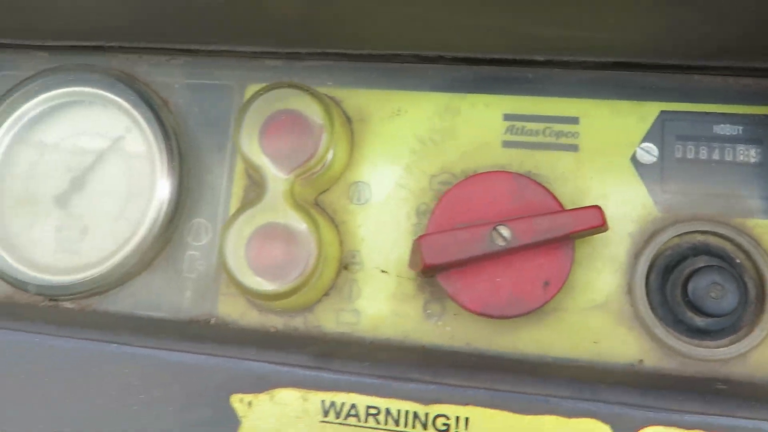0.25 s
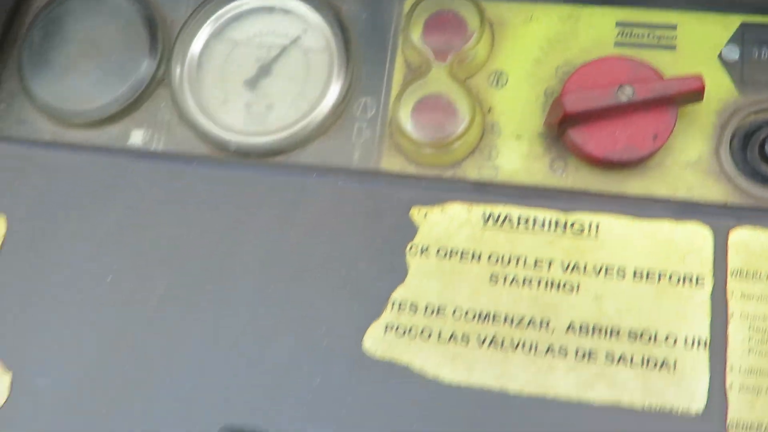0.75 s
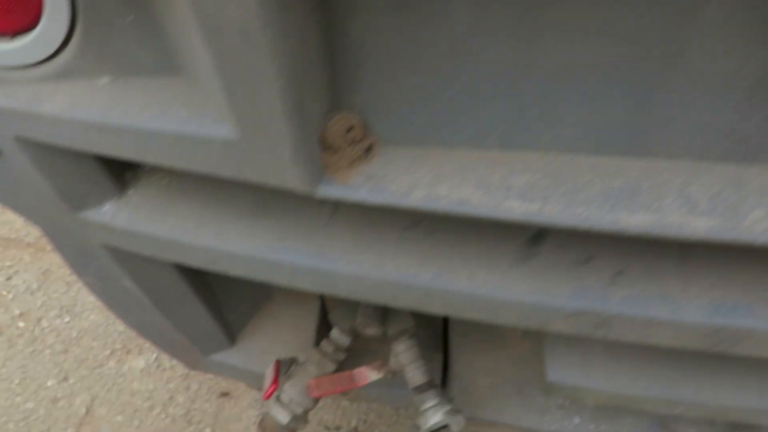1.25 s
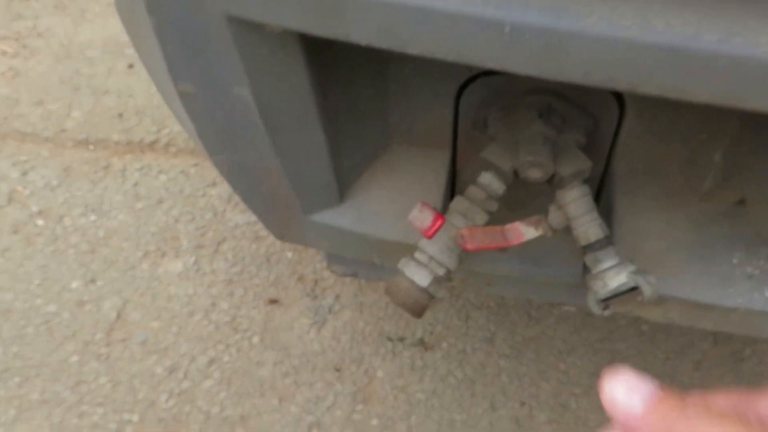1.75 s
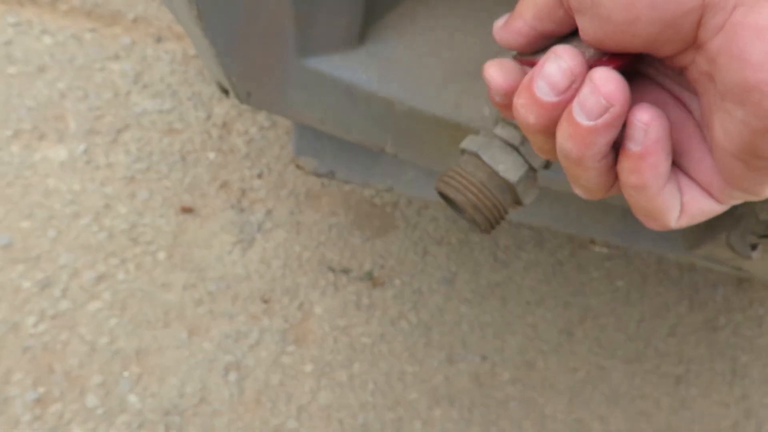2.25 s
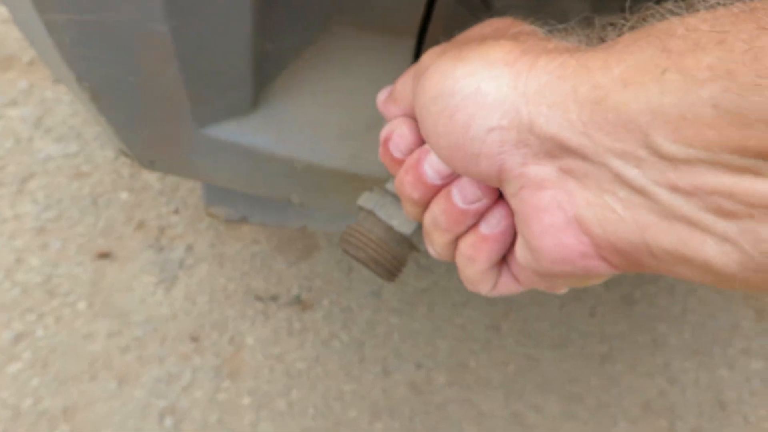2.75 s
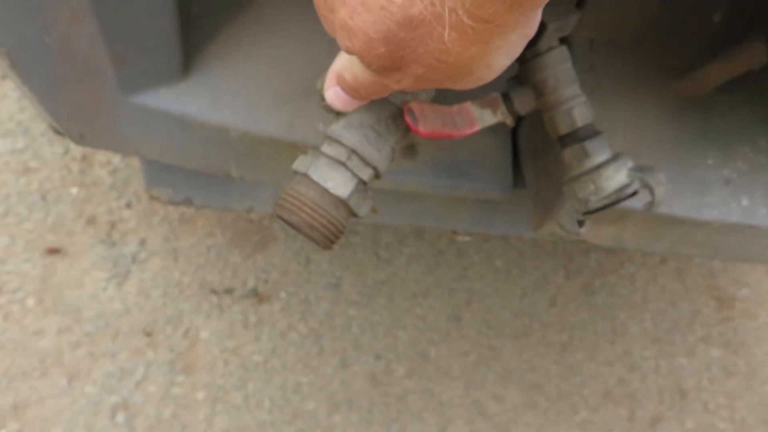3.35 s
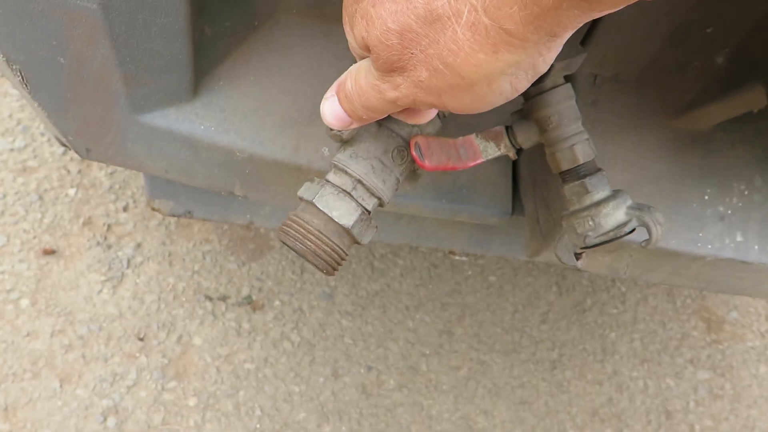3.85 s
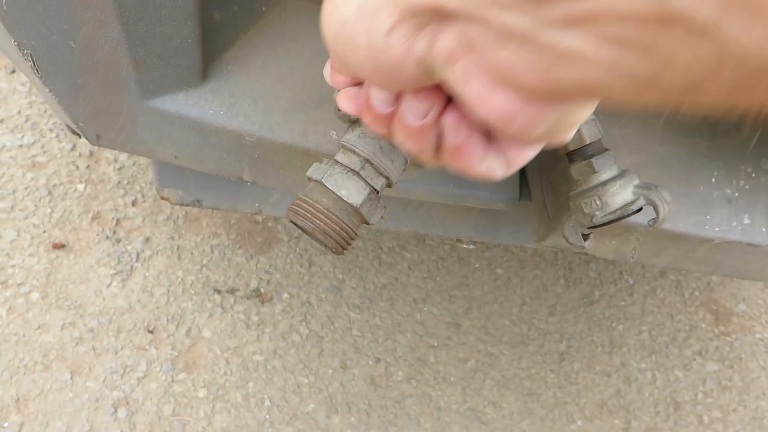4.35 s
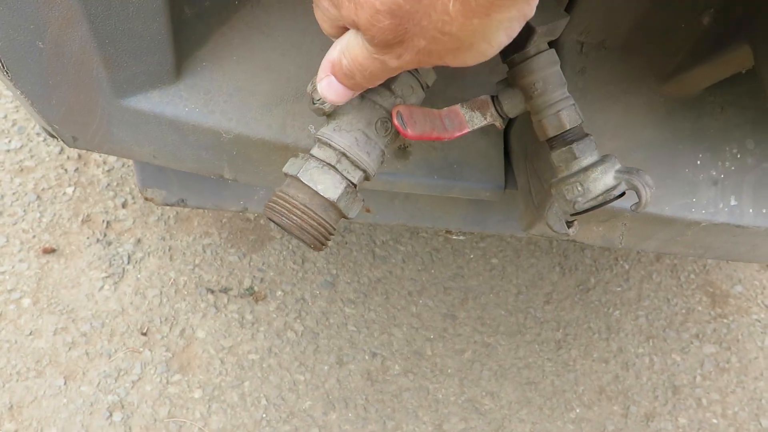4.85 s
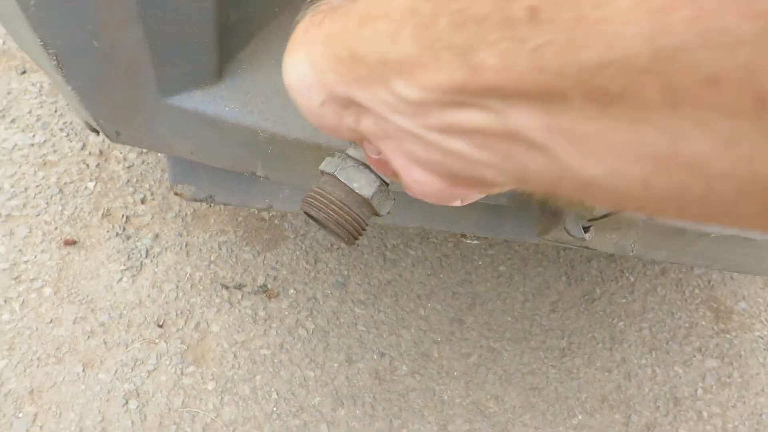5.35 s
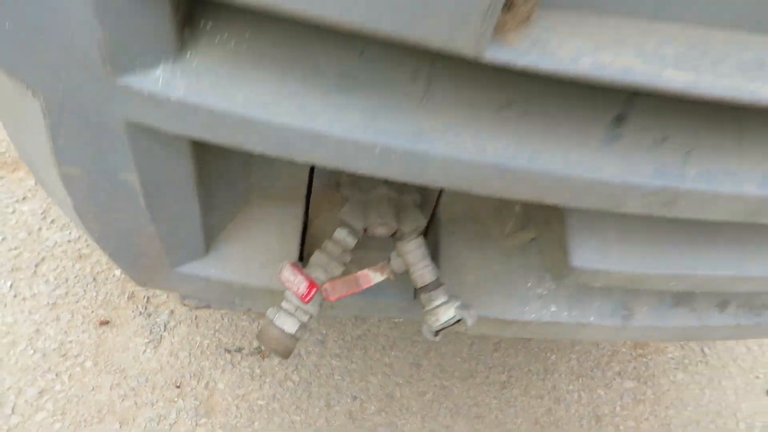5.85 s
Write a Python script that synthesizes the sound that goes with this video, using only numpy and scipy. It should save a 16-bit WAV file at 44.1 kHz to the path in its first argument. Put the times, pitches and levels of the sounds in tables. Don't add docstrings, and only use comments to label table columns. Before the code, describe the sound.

Steady chugging diesel machine close up, then compressed air bursts harshly from a pipe twice, the engine ducking under it and thinner afterwards.

```python
import sys
import numpy as np
from scipy import signal
from scipy.io import wavfile
from scipy.ndimage import uniform_filter1d

SR = 44100
rng = np.random.default_rng(int(sys.argv[2]) if len(sys.argv) > 2 else 0)


def unload_audio(sound):
    columns = np.transpose(np.atleast_2d(sound))
    steps = np.round(np.clip(columns, -1, 1) * 32767)
    wavfile.write(sys.argv[1], SR, steps.astype(np.int16))


def elevation(decibels):
    levels = np.asarray(decibels, float)
    return 10 ** (levels / 20)


N = 269010
T = np.arange(N) / SR
FRAME_T = np.arange(N // 256 + 9) * 256 / SR
BIN_HZ = np.fft.rfftfreq(1024, 1 / SR)

# t/s, cycles f/Hz
ENGINE_SPEED = [
    (0, 12.64),
    (1.5, 12.63),
    (2.0, 12.66),
    (3.45, 12.65),
    (4.6, 12.55),
    (5.4, 12.4),
    (6.1, 12.42),
]
# t/s, place (0 panel, 1 outlets), nearness to the engine level/dB
CAMERA_PATH = [(0, .01, 1.5), (.4, .01, 3.5), (.8, 0.035, 3.5), (1.05, 0.14, -1), (1.3, 0.41, -0.5),
               (1.7, 0.59, 0.5), (2., 0.68, 1.5), (2.3, .93, 1), (3.4, 0.92, 2), (4.85, 1, 2.5),
               (5.4, 1, 3), (5.75, 0.76, -0.5), (6.1, 0.3, -3)]
TONE_ORDERS = [4, 8, 11, 12, 13, 16, 17, 19, 20, 24, 32, 36, 37, 38, 39, 40, 42, 43, 44, 45, 48, 54, 98, 99,
               100, 104, 108, 112, 5, 21]
TONES_PANEL = [-20.5, -26, -39, -27, -39, -32, -32, -35, -31, -34, -32, -38, -41, -48, -41, -34, -47, -46,
               -41, -43, -45, -57, -57, -51, -59, -45, -49, -54, -41, -39]
TONES_MIDWAY = [-20.5, -31, -37, -33, -33, -32, -33, -35, -26, -28, -42, -43, -41, -45, -44, -34, -40, -45,
                -40, -50, -44, -44, -49, -47, -47, -46, -43, -49, -41, -38]
TONES_OUTLET = [-20, -35, -40, -46, -32, -38, -35, -39, -27, -32, -46, -44, -34, -39, -38, -33, -35, -36,
                -38, -39, -37, -39, -43, -39, -36, -44, -39, -43, -41, -42]
# f/Hz, panel level/dB per Hz, outlet level/dB per Hz
KNOCK_SPECTRUM = [(40, -71, -70), (76.4, -51, -74), (137, -67.5, -53.5), (185, -42, -59), (265, -55.5, -57),
                  (374, -61, -59), (595, -62, -58.5), (1080, -66.5, -63), (1890, -62, -62),
                  (2370, -64.5, -65), (3310, -67.5, -66), (4800, -79, -78)]
CYLINDER_KNOCK = [-5, -0.5, -8, -1.5]
# f/Hz, width/Hz, level/dB
HOUSING_RINGS = [(525, 180, 3.5), (670, 37, 3), (950, 190, 4.5), (1294, 186, 8), (1606, 160, 3.5),
                 (2052, 145, 4.5), (2780, 330, 2.5)]
# f/Hz, panel level/dB per Hz, outlet level/dB per Hz
HISS_SPECTRUM = [(1500, -94, -115), (3040, -62.5, -73.5), (4860, -61.5, -68), (7600, -62, -68.5),
                 (8450, -60.5, -67), (10700, -55, -62), (12750, -57, -66), (15800, -66, -75)]
# open t/s, hand's turning time/s, shut t/s, full jet level/dB, held whistle against jet level/dB
VALVE_BLASTS = [
    (3.43, 0.042, 4.452, 17, -9.5),
    (4.862, .013, 5.362, 12.5, -15),
]
# f/Hz, level/dB per Hz
JET_SPECTRUM = [(100, -6), (300, -5.5), (700, -5.5), (1500, -4), (2500, -2), (4000, -1.5), (7000, -3),
                (9500, 0.5), (12500, 1.5), (15500, -8)]
# f/Hz, width/Hz, level/dB
PIPE_RINGS = [(1540, 110, -8), (2080, 830, -4.5), (4450, 670, 2), (9240, 1200, -2.5)]
# t/s, share switched in (0-1)
WIND_SWITCH = [
    (3.49, 0),
    (3.53, .7),
    (3.715, .66),
    (3.73, 1),
]
# f/Hz, likeness (0-1)
ENGINE_LIKENESS = [(60, .9995), (180, 0.97), (550, 0.84), (900, 0.88), (2500, 0.78), (4500, 0.32),
                   (7000, 0.32), (10000, 0.26), (15000, 0.25)]
JET_LIKENESS = [(60, 0.63), (550, 0.76), (1650, 0.89), (3000, 0.36), (4500, 0.53), (6500, 0.11),
                (11000, 0.36), (15000, .2)]
# f/Hz, level/dB
ENGINE_BALANCE = [(60, -4), (130, 1.5), (290, -2.5), (640, -2.0), (1410, -2), (3100, -0.5), (6820, -0.5),
                  (15000, -3)]
JET_BALANCE = [(60, 0.0), (130, -0.32), (290, 0.021), (640, 0.31), (1410, 0.14), (3100, -0.71),
               (6820, -2.0), (15000, 0.0)]
# f/Hz, phase/rad
ENGINE_LEAD = [(50, 0), (300, -.3), (3000, -.15), (5000, -.6), (8000, -2.5), (11000, -3.1), (16000, -3.1)]
JET_LEAD = [(50, 0), (5000, 0), (8000, 1.4), (11000, 1.9), (16000, 1.2)]
# f/Hz with likeness, then level/dB, then phase/rad
GUST_AT_PORTS = [
    [(60, -0.14), (300, -0.73), (1000, -0.77)],
    [(60, 0.), (1000, 0.)],
    [(60, 0), (1000, 0)],
]
ENGINE_AT_PORTS = (ENGINE_LIKENESS, ENGINE_BALANCE, ENGINE_LEAD)
JET_AT_PORTS = (JET_LIKENESS, JET_BALANCE, JET_LEAD)


def evened(x):
    return x / np.sqrt(np.mean(x ** 2) + 1e-20)


def curve(rows, column, t=T):
    return np.interp(t, [r[0] for r in rows], [r[column] for r in rows])


def read(rows, column=1):
    pitches = np.log([r[0] + 1 for r in rows])
    return np.interp(np.log(BIN_HZ + 1), pitches, [r[column] for r in rows])[:, None]


def drift(top_hz, count):
    hz = np.geomspace(.2, top_hz, 12)[:, None]
    rows = []
    for _ in range(count):
        waves = np.sin(2 * np.pi * (hz * FRAME_T + rng.random(hz.shape))) / np.sqrt(hz)
        rows.append(np.interp(T, FRAME_T, evened(waves.sum(0))))
    return rows


def noise(per_hz_db, ports, patchy_db):
    a, b, c, d, patches = rng.standard_normal((len(FRAME_T), 513, 5)).T
    patches = uniform_filter1d(patches, size=10, axis=0)
    patches = evened(uniform_filter1d(patches, size=10, axis=1))
    likeness, balance, lead = ports
    like = np.clip(read(likeness), -1, 1)
    tilt = elevation(read(balance) / 2) * np.exp(.5j * read(lead))
    left, other = a + 1j * b, c + 1j * d
    right = like * left + np.sqrt(1 - like ** 2) * other
    z = np.array([left * tilt, right / tilt])
    flat = signal.istft(z[0], nperseg=1024, noverlap=768)[1].std()
    shaped = z * elevation(per_hz_db + patchy_db * patches)
    x = signal.istft(shaped, nperseg=1024, noverlap=768)[1][:, 1024:N + 1024]
    return x / flat * np.sqrt(SR / 2)


def heard(rows, beyond_db=-110):
    below = (rows[0][0] / 2, beyond_db, beyond_db)
    above = (rows[-1][0] * 2, beyond_db, beyond_db)
    rows = [below] + list(rows) + [above]
    place = np.clip(curve(CAMERA_PATH, 1, FRAME_T - 1024 / SR), 0, 1)
    return read(rows, 1) * (1 - place) + read(rows, 2) * place


def nearness(offset_db):
    return elevation(curve(CAMERA_PATH, 2) + offset_db)


def crank():
    turns = np.cumsum(curve(ENGINE_SPEED, 1)) / SR
    return turns - np.interp(.0614, T, turns)


def exhaust(turns, waver_db=.3, slip=.09, apart=.08):
    place, out = curve(CAMERA_PATH, 1), np.zeros((2, N))
    wavers = drift(5., count=len(TONE_ORDERS))
    slips = drift(3.05, count=len(TONE_ORDERS))
    strengths = zip(TONES_PANEL, TONES_MIDWAY, TONES_OUTLET)
    for order, waver, wander, stops_db in zip(TONE_ORDERS, wavers, slips, strengths):
        loose = np.log(order / 3.8)
        late = rng.uniform(0, 2.5) * (order > 30)
        side = min(loose, 2) * np.array([[-1], [1]])
        level = elevation(np.interp(place, [0, .5, 1], stops_db) + waver_db * loose * waver + 0.2 * side)
        phase = 2 * np.pi * order * turns + slip * loose * wander + apart * side + late
        out -= np.sqrt(2) * level * np.cos(phase)
    refill_db = np.interp(T, (4.4, 4.5), [0, -3.])
    return out * nearness(-1.38 + refill_db)


def puffs(turns, sharp):
    firing = np.floor(4 * turns + .5).astype(int)
    chance_db = 0.56 * rng.standard_normal(400)[firing + 10]
    size_db = np.take(CYLINDER_KNOCK, firing % 4) + chance_db
    return elevation(size_db) * np.exp(sharp * (np.cos(8 * np.pi * turns) - 1))


def knock(turns):
    rings_db = 0
    for hz, width, db in HOUSING_RINGS:
        rings_db = rings_db + db * np.exp(-.5 * ((BIN_HZ[:, None] - hz) / (width / 2)) ** 2)
    body = noise(heard(KNOCK_SPECTRUM) + rings_db, ENGINE_AT_PORTS, patchy_db=0.54)
    return body * evened(1 + .5 * puffs(turns, sharp=13.0)) * nearness(0)


def hiss(turns):
    air = noise(heard(HISS_SPECTRUM), ENGINE_AT_PORTS, patchy_db=1.3)
    throb = evened(1 + 0.3 * puffs(turns + 0.037, sharp=0.83))
    place_db = np.interp(curve(CAMERA_PATH, 1), [0, 1], [-4.5, -0.23])
    return air * throb * nearness(place_db)


def breeze(peak_s=.45, width_s=0.17, level_db=-29):
    band = signal.butter(2, (60., 200.), "band", fs=SR, output="sos")
    low = evened(signal.sosfilt(band, rng.standard_normal(N)))
    lumps = elevation(4. * drift(25., count=1)[0])
    swell = np.exp(-((T - peak_s) / width_s) ** 2)
    return np.array([[1], [-1]]) * low * lumps * elevation(level_db) * swell


def blast(start, turn_s, shut, full_db, held_db):
    creep_db, creep_s, glide_s = -10.5, 0.57, .15
    since, left = np.maximum(T - start, 0), shut - T
    after_shut = np.minimum(left, 0)
    gap = 1 - np.exp(-since / turn_s)
    push = elevation(full_db + creep_db * np.exp(-since / creep_s) + 847 * after_shut)
    opening = np.exp(-(since / (2.86 * turn_s)) ** 2)
    closing = 0.77 * np.exp(-np.maximum(left, 0) / 0.026)
    half = np.maximum(opening, closing)
    ring_db = held_db + (2 - held_db) * half + 500. * after_shut
    part = np.maximum(half, np.exp(-since / glide_s))
    return push * gap ** 3.55, push * gap ** 2.7 * elevation(ring_db), part


def valve():
    flows, rings, parts = np.transpose([blast(*row) for row in VALVE_BLASTS], (1, 0, 2))
    hz = BIN_HZ[:, None]
    jet = evened(noise(read(JET_SPECTRUM) + 0 * FRAME_T, JET_AT_PORTS, patchy_db=1.05))
    part = np.interp(FRAME_T - 1024 / SR, T, parts.min(0))
    pitch = 1.045 + (.95 - 1.045) * part
    wide = 0.61 + (1 - 0.61) * part
    ring = 0
    for f, width, db in PIPE_RINGS:
        ring = ring + elevation(2 * db) / (1 + ((hz - f * pitch) / (wide * width / 2)) ** 2) ** 2
    whistle = evened(noise(10 * np.log10(ring), JET_AT_PORTS, patchy_db=.8))
    lumps_db = -20 * np.log10(1 + (hz / 600) ** 2) - 20 * np.log10(1 + (150 / (hz + 10)) ** 2)
    gust = evened(noise(lumps_db + 0 * FRAME_T, GUST_AT_PORTS, patchy_db=2.))
    flutter = elevation(0.16 * drift(70.0, count=1)[0])
    gust_start_s, gust_end_s, gust_edge_s = 3.52, 4.43, 0.034
    swept = np.clip(np.minimum(T - gust_start_s, gust_end_s - T) / gust_edge_s + 1, 0, 1) ** 2
    gust_db = 10 - 9.5 * (T > WIND_SWITCH[-1][0])
    air = flows.sum(0) * jet + rings.sum(0) * whistle
    return flutter * air + elevation(gust_db) * swept * gust


def scene():
    turns = crank()
    return exhaust(turns) + knock(turns) + hiss(turns) + breeze() + valve()


def wind_filter(dry, cut_hz=560.0, leak_db=-28.5):
    cut = signal.lfilter(*signal.butter(2, cut_hz, "high", fs=SR), dry) - elevation(leak_db) * dry
    share = curve(WIND_SWITCH, 1)
    return (1 - share) * dry + share * cut


def fold(x, loud, quiet_hz=3140.0, loud_hz=990.0, mono_below_hz=380):
    mid, side = (x[0] + x[1]) / 2, (x[0] - x[1]) / 2
    narrow = signal.sosfiltfilt(signal.butter(4, quiet_hz, "high", fs=SR, output="sos"), side)
    wide = signal.filtfilt(*signal.butter(1, loud_hz, "high", fs=SR), side)
    wide = signal.sosfiltfilt(signal.butter(6, mono_below_hz, "high", fs=SR, output="sos"), wide)
    share = curve(WIND_SWITCH, 1) >= 1
    side = (1 - share) * side + share * (loud * wide + (1 - loud) * narrow)
    hum = signal.sosfiltfilt(signal.butter(2, 90, fs=SR, output="sos"), mid)
    mid = mid - .85 * loud * share * hum
    return np.array([mid + side, mid - side])


def roll_off(x):
    return signal.sosfilt(signal.butter(12, 17080, fs=SR, output="sos"), x)


def record(dry, knee_db=-15.5, slope=0.92, follow_s=0.025, held_db=14.0, recover_db=13.5):
    x = wind_filter(dry)
    power_db = 10 * np.log10(abs(uniform_filter1d((x ** 2).mean(0), size=900)) + 1e-12)
    keep = np.exp(-1 / (follow_s * SR))
    quick_db = signal.lfilter([1 - keep], [1, -keep], slope * np.maximum(power_db - knee_db, 0))
    climb = T * recover_db
    slow_db = np.maximum.accumulate(np.minimum(quick_db, held_db) + climb) - climb
    x = x / elevation(np.maximum(quick_db, slow_db))
    x = x / (1 + (x / .8) ** 4) ** .25
    x = fold(x, loud=np.clip((power_db - knee_db) / held_db - .3, 0, 1))
    edge = signal.firwin(511, 15880, window=("kaiser", 9), fs=SR)
    mix = signal.oaconvolve(x, edge[None], "same")
    return roll_off(mix)


dry = scene()
out = record(dry)
unload_audio(out)
```